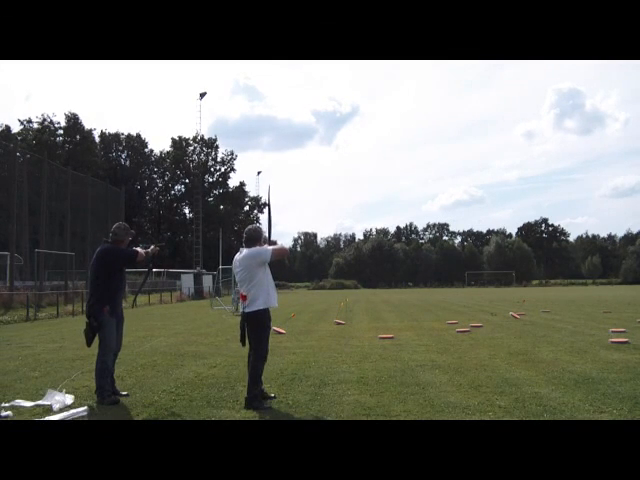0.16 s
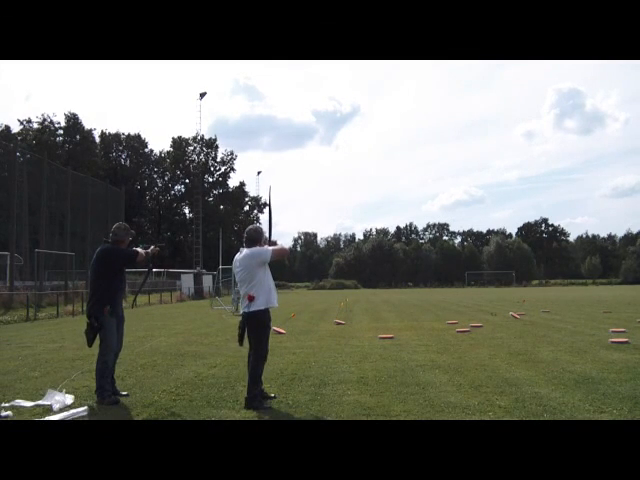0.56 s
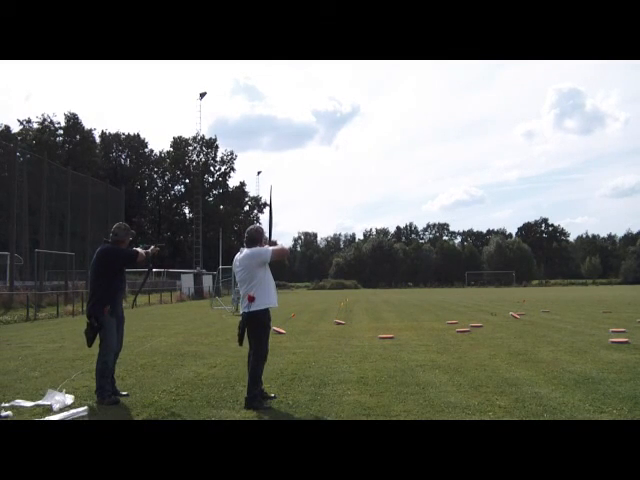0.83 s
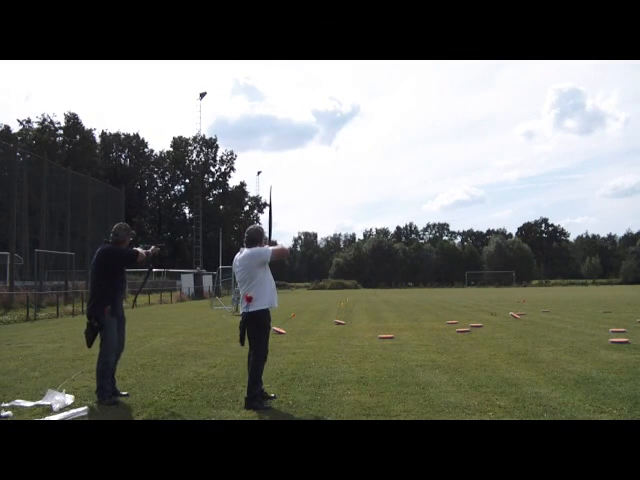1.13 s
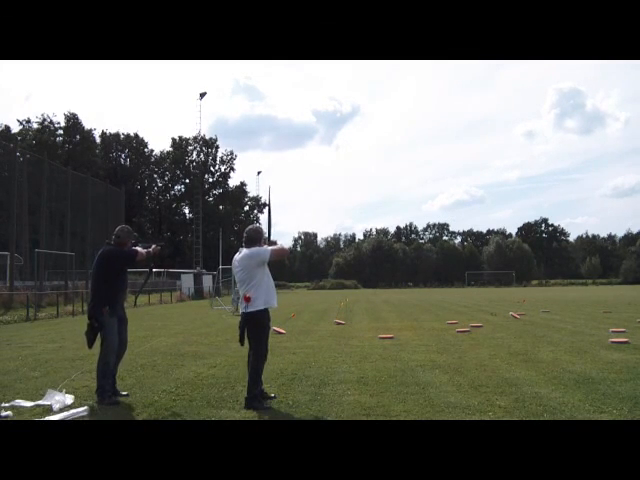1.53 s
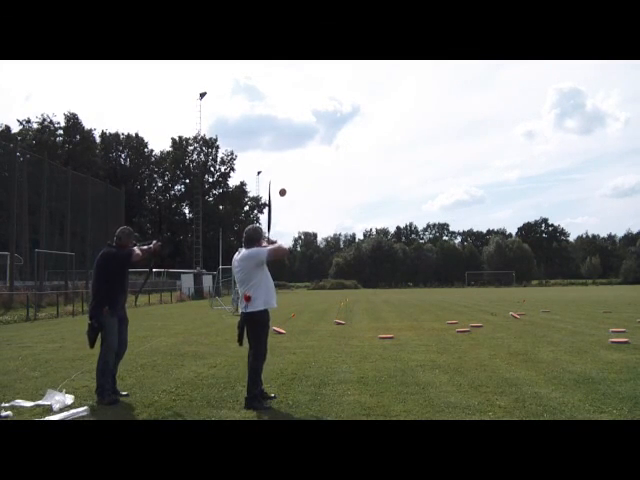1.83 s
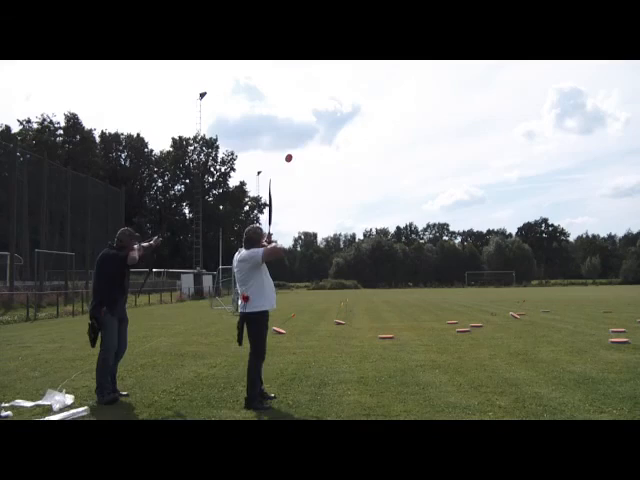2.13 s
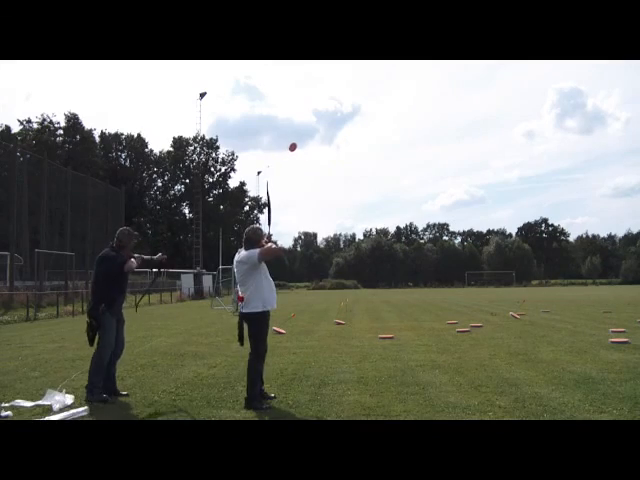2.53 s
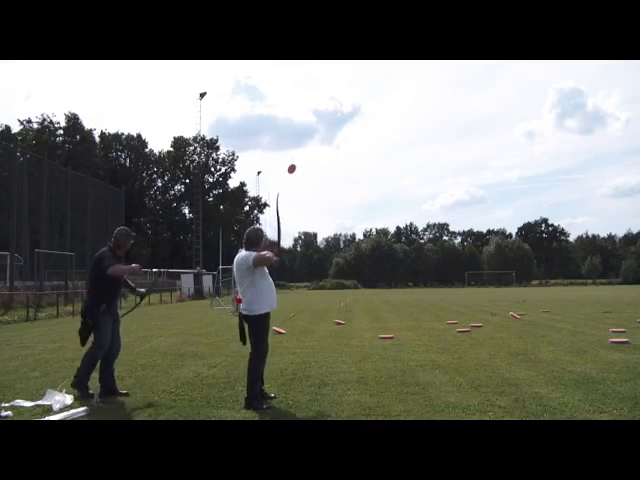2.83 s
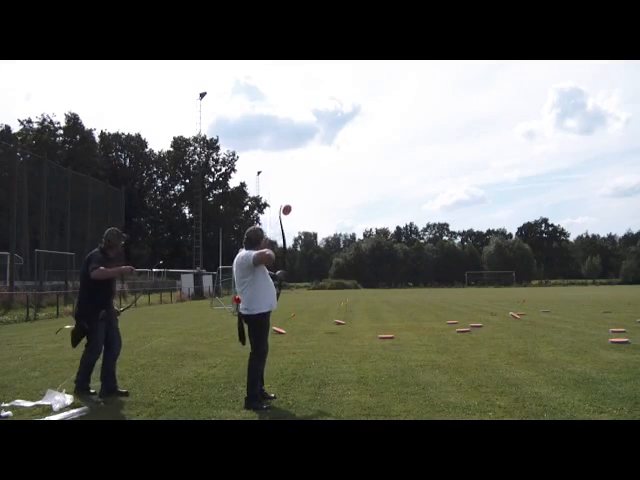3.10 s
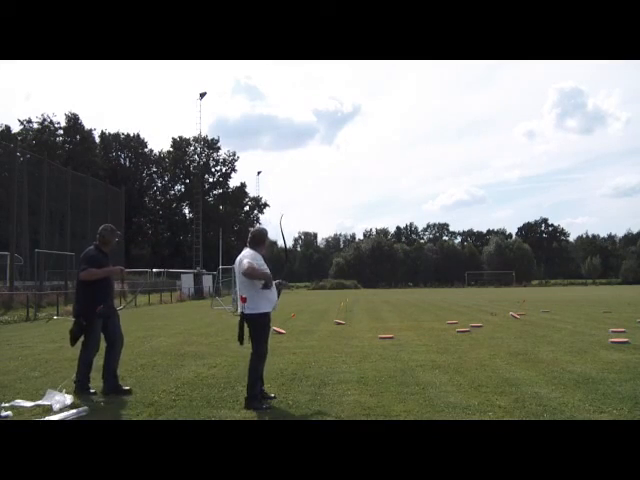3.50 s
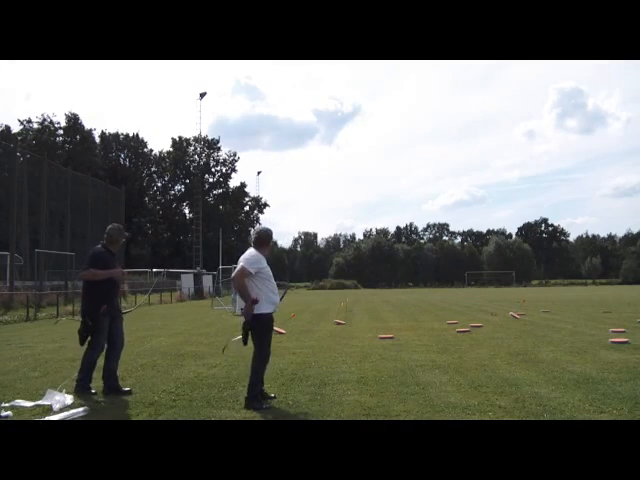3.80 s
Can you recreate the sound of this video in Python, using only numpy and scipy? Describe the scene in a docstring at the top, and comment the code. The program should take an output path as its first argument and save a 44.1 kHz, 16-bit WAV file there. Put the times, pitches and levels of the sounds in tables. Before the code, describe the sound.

On an open grassy field, wind thumps the microphone and a small bird chirps early; later one bow cracks and rings, another snaps and rattles, and a dry knock follows, all somewhat left.

```python
"""Wind buffets the microphone and a small bird calls twice over a quiet outdoor hiss on an open field.
A first bow snaps and rings, a second snaps with a metal rattle, and a dry knock follows.
Cracks are shaped noise, rings are decaying sines, calls are gliding tones.
Wind is noise modulated by eddies on each port; noise tails give the scatter and the trees' faint return.
Small rustles of gear and feet are scattered through the scene."""
import sys
import numpy as np
from scipy import signal
from scipy.fft import rfft, irfft
from scipy.io import wavfile
from scipy.ndimage import uniform_filter1d

SR = 44100
rng = np.random.default_rng(int(sys.argv[2]) if len(sys.argv) > 2 else 0)


def dump_mix(stems):
    """Bounce the given channels to the path in sys.argv[1] as a 16-bit WAV at rate SR."""
    frames = np.atleast_2d(stems).T  # one column per channel
    limited = np.clip(frames, -1, 1)  # hard clip at full scale
    pcm = np.round(limited * 32767).astype(np.int16)
    wavfile.write(sys.argv[1], SR, pcm)


N = 174195


def amp(db):
    """Decibels to gain."""
    return 10 ** (np.asarray(db) / 20)


def unit(x):
    """Scales to rms 1."""
    return x / np.sqrt(np.mean(x ** 2) + 1e-20)


def read(points, hz):
    """Interpolates a spectrum on a log-frequency axis."""
    f, value = np.transpose(sorted(points))
    return np.interp(np.log(hz + 1), np.log(f + 1), value)


def follow(rows):
    """Interpolates a control curve at every sample."""
    return np.interp(np.arange(N) / SR, *np.transpose(rows))


def add(mix, start_s, sound):
    """Adds a sound at its time, cut at the end of the mix."""
    first = max(round(start_s * SR), 0)
    part = mix[..., first:][..., :sound.shape[-1]]
    part += sound[..., :part.shape[-1]]


def pan(db):
    """Left and right gains with mean 1; db is left minus right."""
    gains = amp(np.array([db, -db]).reshape(2, -1) / 2)
    return gains / gains.mean(0)


def sine(hz, t):
    """Steady sine from phase zero."""
    return np.sin(2 * np.pi * hz * t)


BASS_EDGE_HZ = 39


def noise(colour, tilt_db_per_oct=0, size=8192):
    """Random-phase coloured noise of rms 1, without deep bass."""
    hz = np.fft.rfftfreq(size, 1 / SR) + 1
    tilt_db = tilt_db_per_oct * np.log2(np.maximum(hz, 1000) / 4000)
    gain = amp(read(colour, hz) + tilt_db) / (1 + (BASS_EDGE_HZ / hz) ** 2)
    phase = np.exp(2j * np.pi * rng.random(len(hz)))
    return unit(irfft(gain * phase, size))


def wander(rate_hz):
    """Smooth random curve of rms 1, without slow drift."""
    hz = np.fft.rfftfreq(N, 1 / SR)
    band = hz / (hz + 4) / (1 + (hz / rate_hz) ** 2)
    return unit(irfft(rfft(rng.standard_normal(N)) * band, N))


def blows(rows, colour):
    """Short noise bursts: linear rise, exponential decay."""
    out, t = np.zeros(N), np.arange(8192) / SR
    for start_s, level_db, rise_s, decay_s, tilt_db_per_oct in rows:
        rise = np.minimum(t / rise_s, 1)
        decay = np.exp(-np.maximum(t - rise_s, 0) / decay_s)
        add(out, start_s, amp(level_db) * noise(colour, tilt_db_per_oct) * rise * decay)
    return out


RING_ROUGH, RING_FLUTTER_HZ, RING_RISE_S = .6, 60, 0.0025


def ring(start_s, modes, ring_db):
    """Limbs, riser and arrow ring on unevenly as decaying modes after the string slaps home."""
    out, t = np.zeros(N), np.arange(SR // 2) / SR
    body = np.zeros(len(t))
    for hz, mode_db, t60_s in modes:
        tone = np.sin(2 * np.pi * (hz * t + rng.random()))
        flutter = 1 + RING_ROUGH * wander(RING_FLUTTER_HZ)[:len(t)]
        body += amp(mode_db - 60 * t / t60_s) * tone * flutter
    add(out, start_s, amp(ring_db) * body * np.minimum(t / RING_RISE_S, 1))
    return out


# hiss spectrum: (frequency [Hz], relative density [dB per Hz])
AIR_COLOUR = [(300, 3.5), (900, 6), (1700, -1), (2600, -3), (3600, -3), (5000, -7), (9500, -7.5),
              (10400, -22), (11200, -49)]
AIR_DB, AIR_CORRELATION = -63.5, 0.064
WHINE_HZ, WHINE_DB = 7868, -82


def air():
    """Outdoor hiss, nearly independent between channels, and a thin steady whine."""
    a, b = (noise(AIR_COLOUR, size=N) for _ in range(2))
    other = AIR_CORRELATION * a + np.sqrt(1 - AIR_CORRELATION ** 2) * b
    hiss = amp(AIR_DB) * np.array([a, other]) * pan(db=4.5)
    return hiss + amp(WHINE_DB) * np.sqrt(2) * sine(WHINE_HZ, np.arange(N) / SR)


# plain wind spectrum: (frequency [Hz], relative density [dB per Hz])
WIND_COLOUR = [(20, -12), (60, -0.5), (120, -1), (290, -7.5), (450, -14.5), (720, -26), (1100, -36.5),
               (1600, -52.5), (2500, -82), (6000, -104)]
# wind on the left microphone port: (time [s], level [dB])
GUSTS_LEFT = [(0, -28), (0.1, -19.5), (0.25, -15.5), (0.39, -23), (0.52, -17), (0.78, -21.5), (1.42, -21),
              (1.63, -31.5), (1.76, -21), (1.95, -33.5), (2.06, -28), (2.33, -27), (2.45, -36),
              (2.6, -30.5), (2.72, -20.5), (2.9, -27), (2.99, -22), (3.27, -21.5), (3.31, -31),
              (3.35, -18.5), (3.95, -18.5)]
# wind on the right microphone port: (time [s], level [dB])
GUSTS_RIGHT = [(0, -46), (0.19, -39), (0.28, -28), (0.85, -27.9), (1.4, -31), (1.65, -47), (1.78, -34),
               (1.96, -48), (2.3, -39), (2.45, -49), (2.72, -33.3), (2.96, -45), (3.44, -27), (3.72, -27),
               (3.95, -39)]
# gust level at which brightening is zero
LEFT_REF_DB, RIGHT_REF_DB = -17.5, -26
GUST_BRIGHT_DB_PER_DB_OCT = 0.22
EDDY_HZ, EDDY_DB, EDDY_GROWTH = 74.4, 3.5, 0.48  # depth grows with band frequency
FLUTTER_HZ, FLUTTER_DB = 18, .9
LEVELLING_SAMPLES = 6500


def wind():
    """Eddies hit each port separately; the harder they hit, the brighter the puff."""
    hz = np.fft.rfftfreq(N, 1 / SR)
    centres_hz = np.geomspace(30, 3840, 8)
    ports = []
    for gusts, ref_db in ((GUSTS_LEFT, LEFT_REF_DB), (GUSTS_RIGHT, RIGHT_REF_DB)):
        level_db = follow(gusts)
        shape = amp(read(WIND_COLOUR, hz)) * hz / (hz + 5)
        spectrum = rfft(unit(irfft(rfft(rng.standard_normal(N)) * shape, N)))
        eddies_db = EDDY_DB * 2 * np.tanh(wander(EDDY_HZ) / 2)  # soft-limited
        eddies_db = eddies_db + FLUTTER_DB * wander(FLUTTER_HZ)
        port = np.zeros(N)
        for centre_hz, pick in zip(centres_hz, np.eye(len(centres_hz))):
            # overlapping triangular bands sum to the whole spectrum
            band = irfft(spectrum * read(list(zip(centres_hz, pick)), hz), N)
            depth = (min(centre_hz, 1500) / 150) ** EDDY_GROWTH
            octaves = np.log2(max(centre_hz / 150, 1))
            bright_db = (level_db - ref_db) * GUST_BRIGHT_DB_PER_DB_OCT * octaves
            port += band * unit(amp(eddies_db * depth)) * amp(bright_db)
        running_rms = np.sqrt(uniform_filter1d(port ** 2, size=LEVELLING_SAMPLES))
        ports.append(port / running_rms * amp(level_db))
    return np.array(ports)


# hardest buffets: (time [s], peak, mean of both ports [dB], left minus right [dB])
BUFFETS = [(0.121, -26.5, 16.5), (.190, -27, 15), (0.253, -15.5, 24), (.300, -16, 20), (0.361, -23, 17),
           (.463, -20.5, 23), (.504, -17, 7), (0.588, -18, 9), (.741, -16.5, 11), (.871, -21, -26),
           (1.028, -22, -35), (1.214, -25.5, 2), (2.314, -24.5, 16), (2.654, -22, 17), (2.837, -22.5, 8),
           (2.934, -26.5, 18), (2.973, -22, 20), (3.481, -16.5, 6), (3.503, -18.5, 18), (3.528, -15.5, 11),
           (3.566, -21.5, 18), (3.685, -15.5, 16), (3.835, -24, 27), (3.915, -20.5, 8)]
BUFFET_S, BUFFET_EDGE_S = 0.0011, 0.0003


def buffets():
    """A swirl breaks on a port: pressure builds, flips abruptly and relaxes."""
    out, t = np.zeros((2, N)), np.arange(-441, 442) / SR
    for time_s, peak_db, side_db in BUFFETS:
        width_s = BUFFET_S * rng.uniform(1.0, 1.02)
        puff = np.tanh(t / BUFFET_EDGE_S) / np.cosh(t / width_s)
        add(out, time_s + t[0], amp(peak_db) * pan(side_db) * puff / puff.max())
    return out


# echo spectrum: (frequency [Hz], relative density [dB per Hz])
TAIL_COLOUR = [(500, 3.5), (1200, 8.5), (3000, -1), (6000, -3), (9800, -8), (11500, -32)]
NEAR_DB, NEAR_T60_S = -8, 0.14
FAR_DB, FAR_T60_S, FAR_TILT_DB_PER_OCT = -11, 1, 0.2
TAIL_RISE_S = 0.013


def tail(x, t60_s, tilt_db_per_oct):
    """Convolves a sound with decaying coloured noise."""
    t = np.arange(SR) / SR
    h = noise(TAIL_COLOUR, tilt_db_per_oct, size=SR) * amp(-60 * t / t60_s)
    h *= np.minimum(t / TAIL_RISE_S, 1)
    return signal.fftconvolve(x, h / np.linalg.norm(h))[:N] / np.sqrt(2)


def field(x):
    """Short scatter from the ground and fence, and a faint longer tail from the trees."""
    sides = []
    for _ in range(2):
        near = amp(NEAR_DB) * tail(x, NEAR_T60_S, 0)
        far = amp(FAR_DB) * tail(x, FAR_T60_S, FAR_TILT_DB_PER_OCT)
        sides.append(near + far)
    return np.array(sides)


# bird calls: (time [s], level [dB])
CALLS = [(.017, -63), (.167, -60)]
# shape of a call: (time after its start [s], pitch [Hz], relative level [dB])
CALL_SHAPE = [(0, 4100, -6), (.005, 3900, -3), (.025, 2900, -11), (.033, 3200, -11), (.037, 4100, -6),
              (.040, 4800, -16), (.049, 4950, -10), (.053, 4200, -20), (.057, 3500, -3), (.066, 3000, 1),
              (.073, 2600, -13), (.085, 2150, -9)]
# pulses of a faint peep: (time [s], length [s], pitch [Hz], level [dB])
PEEPS = [(1.145, .026, 2950, -58), (1.161, 0.021, 2900, -59.5)]
CALL_ROUGH, CALL_FLUTTER_HZ = .4, 170


def birds():
    """Two zigzag gliding calls and a two-pulse peep, roughened by fast random flutter."""
    out = np.zeros(N)
    at_s, pitch_hz, shape_db = np.transpose(CALL_SHAPE)
    t = np.arange(0, at_s[-1], 1 / SR)
    phase = 2 * np.pi * np.cumsum(np.interp(t, at_s, pitch_hz)) / SR
    call = amp(np.interp(t, at_s, shape_db)) * np.sin(phase) * signal.windows.tukey(len(t), .1)
    for start_s, level_db in CALLS:
        add(out, start_s, amp(level_db) * call)
    for start_s, length_s, hz, level_db in PEEPS:
        t = np.arange(0, length_s, 1 / SR)
        add(out, start_s, amp(level_db) * np.hanning(len(t)) * sine(hz, t))
    return out * (1 + CALL_ROUGH * wander(CALL_FLUTTER_HZ))


# gear and feet: (time [s], level [dB], rise [s], decay [s], tilt [dB per octave])
RUSTLES = [(.73, -54.5, .0025, .004, 0), (1.485, -59, .008, .015, 0), (3.248, -57, .003, .012, -2),
           (3.388, -59, .003, .01, 0), (3.605, -59, .004, .01, 2), (3.711, -62, .003, .035, 4)]
# rustle spectrum: (frequency [Hz], relative density [dB per Hz])
RUSTLE_COLOUR = [(500, 3), (2500, 10.5), (5000, 2), (9500, 0.5), (11000, -44)]


def rustles():
    """Gear and feet rub softly: small noise bursts."""
    return blows(RUSTLES, RUSTLE_COLOUR)


# dry knock: (time [s], level [dB], rise [s], decay [s], tilt [dB per octave])
KNOCKS = [(3.0757, -30.5, .0008, .0032, -.3), (3.0802, -41, .001, .003, 1.5)]
# knock spectrum: (frequency [Hz], relative density [dB per Hz])
KNOCK_COLOUR = [(500, -14), (1600, -7), (2030, -3), (2500, -11), (4100, 1), (5500, -9), (7000, -3),
                (9600, -1), (10500, -8), (11200, -20), (14400, -36)]


def knock():
    """A dry double-edged knock: two noise bursts a few milliseconds apart."""
    return blows(KNOCKS, KNOCK_COLOUR)


# swishes, the last an arrow sliding past the bow: (time [s], length [s], level [dB])
SLIDES = [(1.499, 0.24, -67), (2.34, 0.031, -46.5)]
# swish spectrum: (frequency [Hz], relative density [dB per Hz])
SLIDE_COLOUR = [(600, -10), (1300, -1), (2300, 0), (4000, -8), (9000, -18), (11500, -45)]


def slides():
    """Soft friction noise that swells late and drops away."""
    out = np.zeros(N)
    for start_s, length_s, level_db in SLIDES:
        u = np.arange(0, length_s, 1 / SR) / length_s
        swell = np.sin(np.pi * u ** 2)
        add(out, start_s, amp(level_db) * swell * noise(SLIDE_COLOUR, size=len(u)))
    return out


# metal rattle on the second bow: (time [s], level [dB])
RATTLES = [(2.718, -25), (2.7304, -27.5), (2.749, -31.5), (2.7664, -35.5), (2.797, -39.5), (2.8278, -48.5)]
# rattle spectrum: (frequency [Hz], relative density [dB per Hz])
RATTLE_COLOUR = [(2000, -30), (6800, -21), (7600, -5.5), (8700, 6), (9400, -6), (10200, -9), (11300, -40)]
RATTLE_RISE_S, RATTLE_DECAY_S = .0004, 0.0024


def rattle():
    """Metal on the second bow rattles: bright noise clicks of falling level."""
    rows = [(s, db, RATTLE_RISE_S, RATTLE_DECAY_S, 0) for s, db in RATTLES]
    return blows(rows, RATTLE_COLOUR)


# second bow: (time [s], level [dB], rise [s], decay [s], tilt [dB per octave])
SECOND_BOW = [(2.700, -46.5, 0.0035, .075, -2), (2.717, -34, 0.0052, 0.0095, -1),
              (2.7305, -31.5, 0.0021, 0.0035, -2)]
# crack spectrum: (frequency [Hz], relative density [dB per Hz])
SECOND_COLOUR = [(500, -4), (1200, -13), (2300, -13), (2750, -11.5), (3600, -15), (4600, -9.5), (7000, -7),
                 (8600, -6.5), (10400, -5.5), (11600, -31), (13100, -12), (14400, -40)]
# ring modes: (frequency [Hz], relative level [dB], t60 [s])
SECOND_MODES = [(950, 2, .06), (2780, 2, .09), (4750, -4, .06)]
SECOND_RING_S, SECOND_RING_DB = 2.724, -45


def second_bow():
    """Release and string slap as noise cracks, and the ring of the bow."""
    return blows(SECOND_BOW, SECOND_COLOUR), ring(SECOND_RING_S, SECOND_MODES, SECOND_RING_DB)


# first bow, with a faint echo from the fence at 2.418 s: (time [s], level [dB], rise [s], decay [s], tilt [dB
# per octave])
FIRST_BOW = [(2.3195, -34.5, .001, 0.0078, -1), (2.3772, -27.5, 0.00048, 0.002, 2.5),
             (2.3945, -32.5, 0.0018, 0.0061, 5.5), (2.398, -32, 0.00055, 0.012, 2.5),
             (2.418, -48, 0.0034, 0.022, 4), (2.459, -47.5, 0.0016, 0.0089, 4)]
# crack spectrum: (frequency [Hz], relative density [dB per Hz])
FIRST_COLOUR = [(550, -30), (900, -16), (1130, -7), (1450, -8), (2360, -4.5), (2680, -1), (3300, -6),
                (5100, -13), (7000, -10), (7900, -6), (9000, -13), (10300, -13), (11400, -24), (14400, -38)]
# ring modes: (frequency [Hz], relative level [dB], t60 [s])
FIRST_MODES = [(1136, -4, .24), (1765, -3, .24), (1890, -3, .18), (2245, -3, .2), (2625, 13, .05),
               (2760, 1, .11), (3050, 4, .06), (7900, 10, .07)]
FIRST_RING_S, FIRST_RING_DB = 2.397, -43


def first_bow():
    """Release and string slap as noise cracks, a faint echo from the fence, and the ring of the bow."""
    return blows(FIRST_BOW, FIRST_COLOUR), ring(FIRST_RING_S, FIRST_MODES, FIRST_RING_DB)


BOW_PAN_DB = 8
SCATTER_DB, SCATTER_S = -0.5, 0.0016
SHADE_HZ, SHADE_WIDTH_HZ, SHADE_DB = 6460, 1000, -6.5


def place(x, side_db):
    """Sound from the left: the camera body scatters it on the right and shades its treble."""
    t, hz = np.arange(512) / SR, np.fft.rfftfreq(N, 1 / SR)
    h = rng.standard_normal(len(t)) * np.exp(-t / SCATTER_S)
    right = x + amp(SCATTER_DB) * signal.fftconvolve(x, h / np.linalg.norm(h))[:N]
    shade_db = SHADE_DB * (1 + np.tanh((hz - SHADE_HZ) / SHADE_WIDTH_HZ)) / 2
    right = irfft(rfft(right) * amp(shade_db), N)
    return np.array([x, right]) * pan(side_db)


def scene():
    """Bows to the left, in wind; the rings send no echo, the knock and rattle only half."""
    background = air() + wind() + buffets()
    small = birds() + rustles()
    hits = knock() + rattle()
    second_crack, second_ring = second_bow()
    first_crack, first_ring = first_bow()
    shots = first_crack + second_crack + slides()
    echoes = field(shots + small + .5 * hits) * pan(db=6.0)
    direct = place(shots + first_ring + second_ring + hits, BOW_PAN_DB)
    return background + small * pan(db=10.0) + echoes + direct


CUT_HZ = 14600


def record(dry):
    """Band limit of the recorder: linear-phase low-pass."""
    lowpass = signal.firwin(511, CUT_HZ, window=("kaiser", 9), fs=SR)
    return signal.oaconvolve(dry, lowpass[None], "same")


dry = scene()
out = record(dry)
dump_mix(out)
```